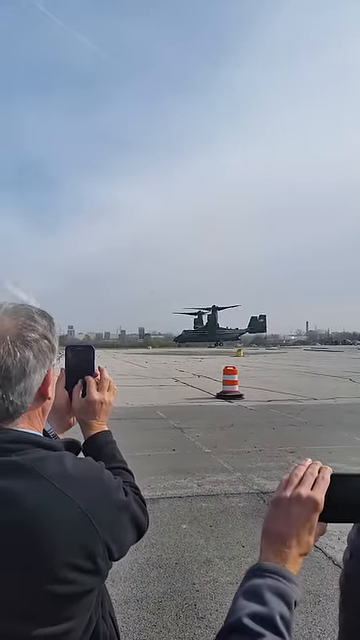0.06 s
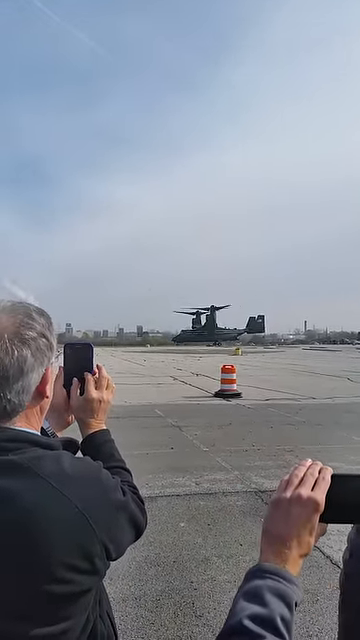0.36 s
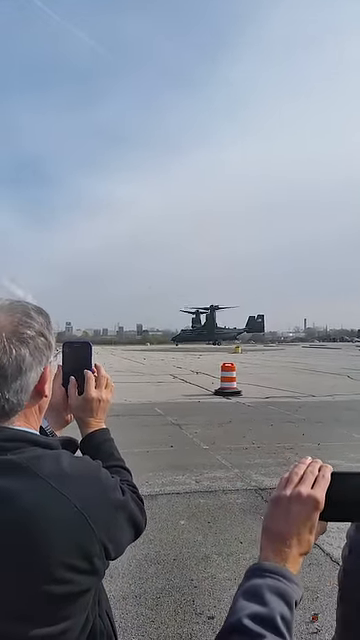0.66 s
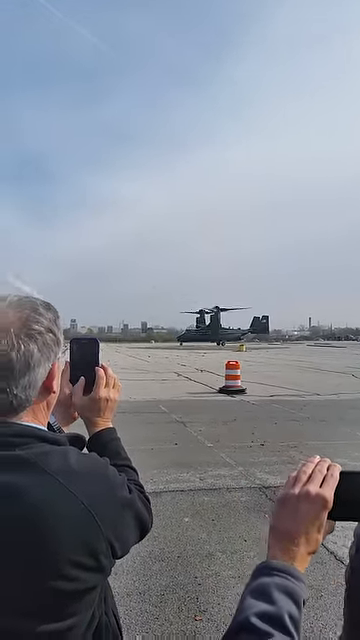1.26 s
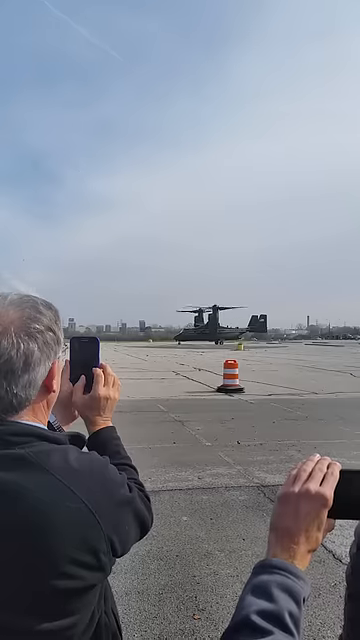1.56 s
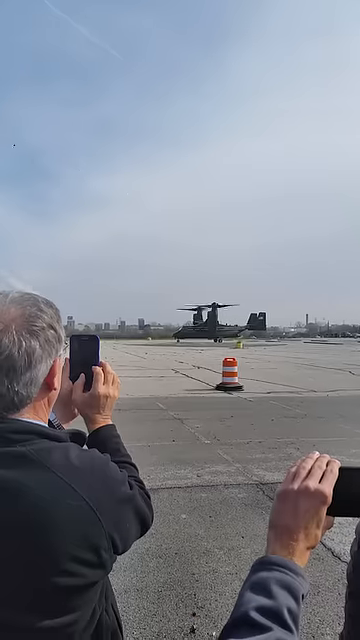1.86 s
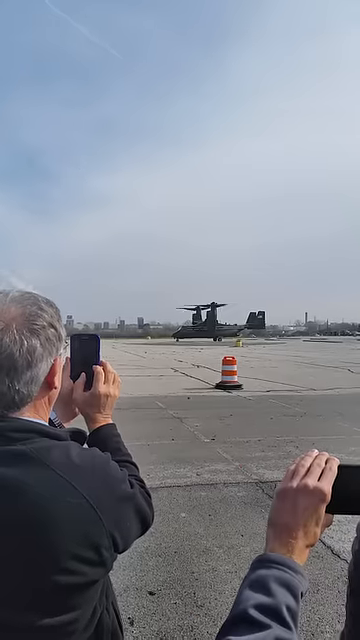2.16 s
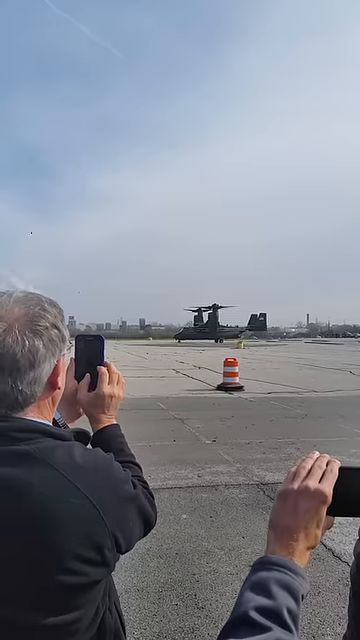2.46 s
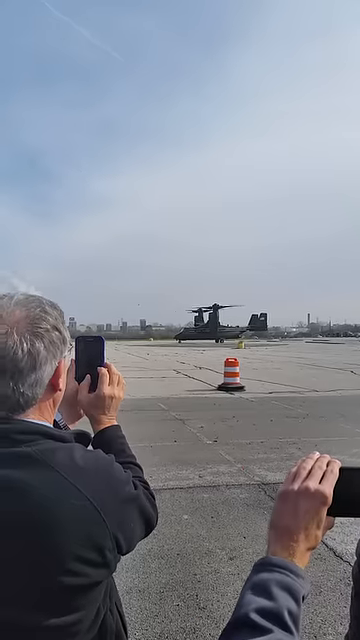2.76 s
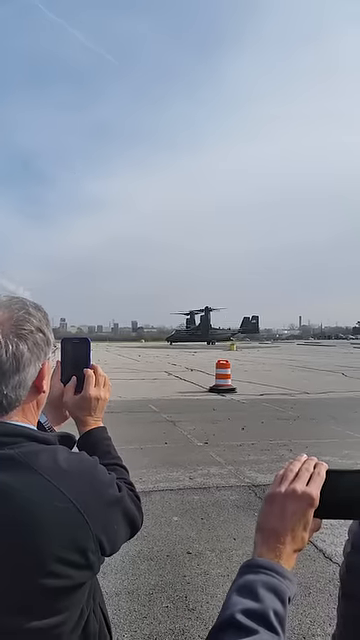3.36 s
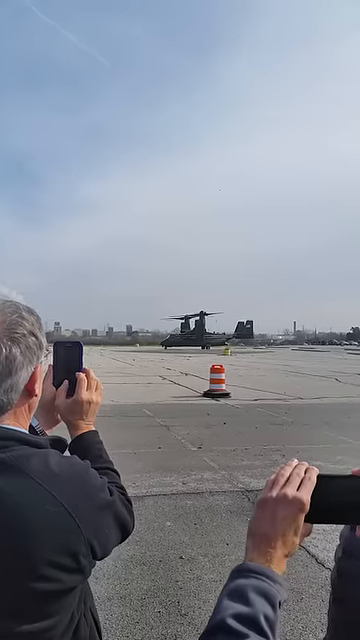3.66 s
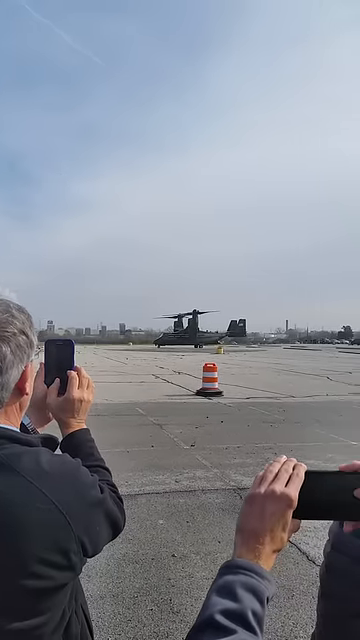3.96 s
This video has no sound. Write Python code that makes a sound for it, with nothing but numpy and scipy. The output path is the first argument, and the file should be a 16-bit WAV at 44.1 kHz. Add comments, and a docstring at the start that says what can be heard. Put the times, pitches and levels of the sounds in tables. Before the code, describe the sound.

Tiltrotor aircraft rotors chopping fast and heavy over a steady roar and turbine hiss.

```python
"""A fast, heavy chopping, about twenty beats a second: a tiltrotor aircraft on open concrete.
Each passing blade pushes air aside with a round thump, then hits the swirl left by a blade tip
with a sharper slap and a ragged burst of noise. Underneath, air blown downward roars and the
turbines hiss and whine. Near the end the rotors slow a little, the slaps give way to deeper
thumps and a pulsing swish, and the hiss swells."""
import sys
import numpy as np
from scipy import signal
from scipy.fft import rfft, irfft
from scipy.io import wavfile

SR = 44100
rng = np.random.default_rng(int(sys.argv[2]) if len(sys.argv) > 2 else 0)


def store_wav(level_fs):
    """Save 16-bit WAV to argv[1]."""
    pcm = np.round(np.clip(np.atleast_2d(level_fs), -1, 1) * 32767)
    wavfile.write(sys.argv[1], SR, pcm.T.astype(np.int16))


N = 176400
T = np.arange(N) / SR
HZ = np.maximum(np.fft.rfftfreq(N, 1 / SR), 1)

# how fast the blades pass (time [s], rate [passes per s])
BLADE_RATE = [(0, 20.49), (1.3, 20.58), (1.9, 20.53), (2.3, 20.73), (2.7, 20.62), (3.0, 20.1), (3.3, 19.97),
              (3.6, 19.56), (4, 19.54)]
# the wait from thump to slap (time [s], delay [s])
SLAP_DELAY = [(0, 0.014), (.25, 0.012), (.6, 0.01), (.83, 0.0088), (.95, 0.01), (1.1, 0.0087),
              (1.95, 0.0097), (2.2, 0.0077), (2.45, .0095), (2.75, 0.008), (3, 0.0088), (4, 0.0083)]
def rotors():
    """The passing blades set one beat for all these sounds."""
    rate = in_time(BLADE_RATE)[0]
    count = np.cumsum(rate) / SR - 0.09  # a blade passes at each whole number
    passes = np.interp(np.arange(int(count[-1]) + 1), count, T)
    strikes = passes + in_time(SLAP_DELAY, passes)[0]
    slap_count = count - in_time(SLAP_DELAY)[0] * rate
    beats = thumps(passes) + slaps(strikes) + wake(strikes) + crackle(strikes)
    return beats + swish(passes) + knocks(strikes) + drone(passes) + hum(count) + tones(slap_count)

# each rotor's thump (time [s], peak [dB], pitch [Hz])
FIRST_THUMP = [(0, -12.5, 126.4), (.3, -14, 91), (0.501, -8, 116.5), (.87, -21.5, 135),
               (1.25, -10.5, 111.4), (1.4, -16.5, 89), (1.529, -8.5, 121), (1.82, -10, 124),
               (2.05, -13.5, 104.5), (2.4, -8.5, 121), (2.7, -5, 107), (3.0, -11, 89), (3.3, -4, 108.7),
               (3.549, -8, 99), (3.75, -5.5, 83), (4, -13.5, 61.6)]
SECOND_THUMP = [(0, -9.5, 147), (.27, -13.5, 174), (.4, -33, 162), (.53, -15.5, 168), (.75, -14, 162.4),
                (1.1, -20.5, 154), (1.7, -16.5, 149), (2.0, -17, 159.7), (2.4, -10, 154),
                (2.63, -15, 150.4), (2.92, -8, 160), (3.3, -27.5, 174), (3.8, -28, 156), (4, -20.5, 163)]
def thumps(passes):
    """Each blade pushes air aside; the second rotor follows just behind the first."""
    first = pulses(passes, FIRST_THUMP, rise_s=0.0066, fall_s=0.0054, vary_db=1, vary_s=0.000067)
    second = pulses(passes + 0.00888, SECOND_THUMP, rise_s=0.0053, fall_s=0.019, vary_db=1, vary_s=0.0002)
    return first + second

# the slap (time [s], peak [dB], pitch [Hz])
SLAP = [(0, 0.5, 207), (.11, -15.5, 230), (0.232, 2.5, 201), (0.399, -9, 208), (.5, -2.5, 188),
        (.65, -0.5, 220), (.77, 0, 207), (.89, -10.5, 206), (1.02, -2.5, 226), (1.171, -9.5, 191),
        (1.45, -8.5, 199), (1.599, -29, 183), (1.88, -15.5, 205), (2.12, -6.5, 207), (2.42, -13.5, 188),
        (2.75, -16, 247), (3.05, -2, 194), (3.341, -4.5, 234), (3.52, -10.5, 210), (4, -12, 194)]
# its echoes (delay [s], level [dB])
ECHOES = [(.0092, -18.5), (0.0194, -22)]
def slaps(strikes):
    """A blade hits the swirl of air left by a blade tip; two faint echoes follow."""
    slap = pulses(strikes, SLAP, rise_s=0.0031, fall_s=0.004, vary_db=0.5, vary_s=0.00065)
    return slap + sum(from_db(db) * np.interp(T - delay, T, slap, left=0) for delay, db in ECHOES)

# churned air (time [s], level [dB]) and its tone (pitch [Hz], level [dB])
WAKE_LEVEL = [(0, -11.5), (.15, -23.5), (.37, -12), (.52, -20), (.95, -13.5), (1.4, -22.5), (1.83, -25),
              (1.998, -14), (2.28, -13), (2.469, -25.5), (2.631, -14), (2.85, -14.5), (3.08, -20.5),
              (3.33, -20), (3.5, -41.5), (3.7, -26), (4, -25.5)]
WAKE = [(30, -20), (80, -4.5), (170, -8), (300, 4.5), (365, -8.5), (415, -2), (500, -18.5), (650, -17.5),
        (1000, -33.5), (1500, -40), (4000, -85)]
def wake(strikes):
    """Churned air behind the blades gives a ragged burst on each beat."""
    return bursts(strikes - 0.001, WAKE_LEVEL, WAKE, rise_s=0.0096, fall_s=0.026, memory=0.86, vary_db=0.6)

# crackle (time [s], level [dB]) and its tone (pitch [Hz], level [dB])
CRACKLE_LEVEL = [(0, -24.5), (.2, -26.5), (.5, -43.5), (1.0, -37.5), (1.299, -28.5), (1.8, -28.5),
                 (2.3, -33), (2.6, -24), (3.0, -33), (3.25, -37.5), (4, -19.5)]
CRACKLE = [(200, 7.5), (600, 6), (1000, 1.5), (1400, -4), (2400, -5.5), (3200, -10), (5000, -18.5),
           (12000, -37)]
def crackle(strikes):
    """A bright, uneven edge on each slap."""
    return bursts(strikes - 0.003, CRACKLE_LEVEL, CRACKLE,
                  rise_s=0.0051, fall_s=0.0084, memory=0.18, vary_db=4)

# swish (time [s], level [dB]) and its tone (pitch [Hz], level [dB])
SWISH_LEVEL = [(0, -76), (2, -46), (3.1, -36.5), (3.4, -27), (3.65, -25), (4, -24)]
SWISH = [(200, -35), (700, 3), (1300, -3), (2300, 2), (3200, -6.5), (4500, -8.5), (6000, -12), (7800, -7),
         (10000, -10.5), (13000, -25.5)]
def swish(passes):
    """Blades swish through the air, loudest near the end."""
    return bursts(passes + 0.003, SWISH_LEVEL, SWISH, rise_s=0.0095, fall_s=0.024, memory=0.05, vary_db=1)

# knock (time [s], level [dB]) and its tone (pitch [Hz], level [dB])
KNOCK_LEVEL = [(0, -29.5), (.55, -24.5), (1.08, -23.5), (1.25, -26.5), (1.8, -29), (1.949, -27),
               (2.25, -23.5), (2.42, -26.5), (2.56, -24.5), (2.95, -39.5), (3.2, -24.5), (3.5, -25),
               (4, -38)]
KNOCK = [(200, -8.5), (450, -8.5), (680, 9), (1000, -6.5), (1400, -13.5), (2400, -16), (5000, -39),
         (12000, -68)]
def knocks(strikes):
    """A hard knock starts each slap."""
    return bursts(strikes - 0.003, KNOCK_LEVEL, KNOCK, rise_s=0.0049, fall_s=0.011, memory=0.5, vary_db=2)

# hard blade hits (time [s], crack [dB], knock [dB])
HARD_HITS = [(0.01, -16, -24.5), (0.064, -25, -21), (.305, -32, -26), (.55, -46.5, -22.5),
             (0.936, -31, -19.5), (1.037, -38, -21), (1.372, -17.5, -28), (1.422, -27, -26.5),
             (1.518, -22.5, -23), (1.921, -36, -19), (1.965, -33, -19), (2.304, -32, -17.5),
             (2.347, -27.5, -16), (2.542, -37, -19), (3.475, -32.5, -23.5), (3.526, -25.5, -29),
             (3.631, -25.5, -21), (3.68, -26, -32.5)]
# the crack's tone (pitch [Hz], level [dB])
CRACK = [(300, 2), (900, 6.5), (2400, 8.5), (3300, -17), (5000, -13), (12000, -39)]
def cracks():
    """Now and then a blade hits a swirl squarely: a bright crack over a dull knock."""
    bright = sum(from_db(db) * swell(T - s, rise_s=0.001, fall_s=0.0025) for s, db, _ in HARD_HITS)
    dull = sum(from_db(db) * swell(T - s, rise_s=0.0018, fall_s=0.003) for s, _, db in HARD_HITS)
    return spread(bright * noise(CRACK) + dull * noise(KNOCK))

# drone (time [s], level [dB]) and its tone (pitch [Hz], level [dB])
DRONE_LEVEL = [(0, -14), (.6, -29.5), (1.1, -46.5), (1.85, -29), (2.05, -19.5), (2.3, -21.5), (2.55, -22.5),
               (2.85, -25.5), (3.1, -28), (4, -28)]
DRONE = [(40, -35), (65, -18), (95, 2), (150, -2.5), (200, -3), (300, 1.5), (400, -3), (900, -62)]
def drone(passes):
    """A low, rolling sound fills the gaps between beats."""
    return bursts(passes + 0.028, DRONE_LEVEL, DRONE, rise_s=0.017, fall_s=0.033, memory=0.98, vary_db=1.3)

# deep hum (time [s], level [dB])
HUM_LEVEL = [(0, -34.5), (.3, -39.5), (1.1, -35.5), (2, -33.5), (2.8, -29), (3.07, -42), (3.4, -26.5),
             (3.65, -34.5), (3.9, -32.5), (4, -14)]
def hum(count):
    """The rotors press on the air and hum at twice the blade rate."""
    return from_db(in_time(HUM_LEVEL)[0]) * np.sqrt(2) * np.cos(2 * np.pi * 2 * count)

# three pitches [times the blade rate] and their levels (time [s], low [dB], middle [dB], high [dB])
MULTIPLES = [5, 8, 11]
TONE_LEVELS = [(0, -38, -23.5, -36), (.3, -45, -25, -27), (.7, -46.5, -32, -22.5),
               (1.101, -45.5, -36, -32.5), (1.8, -50, -42, -52), (2.05, -20.5, -28.5, -35),
               (2.27, -20.5, -24, -36), (2.5, -42, -32, -33.5), (3.1, -43, -42, -32),
               (4, -37.5, -39.5, -46)]
def tones(slap_count):
    """Clean rotor tones whose waves peak with the slaps."""
    gains = from_db(in_time(TONE_LEVELS)) * np.sqrt(2)
    return sum(gain * np.cos(2 * np.pi * k * slap_count) for k, gain in zip(MULTIPLES, gains))

# roar (time [s], level [dB]) and its tone (pitch [Hz], level [dB])
ROAR_LEVEL = [(0, -25), (1, -25.5), (1.7, -25), (2.25, -22), (3.1, -25), (3.6, -23.5), (4, -20.5)]
ROAR = [(20, -27), (60, 3.5), (110, 5), (250, 2.5), (480, -5.5), (680, -10), (1000, -13), (1350, -19.5),
        (1900, -22), (2350, -19), (3000, -38.5), (4500, -43), (12000, -67)]
def roar():
    """Air blown down by the rotors roars steadily."""
    return steady_noise(ROAR_LEVEL, ROAR, flutter_db=1.75)

# turbine and exhaust hiss (time [s], level [dB]) and their tones (pitch [Hz], level [dB])
TURBINE_LEVEL = [(0, -38), (.45, -43.5), (.95, -44), (1.25, -42.5), (1.9, -45), (2.3, -39), (3.1, -39.5),
                 (3.6, -36.5), (4, -33.5)]
EXHAUST_LEVEL = [(0, -83), (2.15, -76.5), (2.4, -54.5), (3.1, -51), (3.6, -39), (4, -39.5)]
TURBINE = [(1000, 7.5), (2400, 7), (3500, 4.5), (4800, 2), (5800, -1), (6800, 4), (8000, 1), (9300, -2),
           (11000, -20.5), (13000, -42)]
EXHAUST = [(2000, -5), (5000, -5.5), (8000, -9), (10500, 7.5), (12500, 5)]
def engine_hiss():
    """The turbines hiss throughout; their brighter exhaust swells late."""
    turbine = steady_noise(TURBINE_LEVEL, TURBINE, flutter_db=1.23)
    return turbine + steady_noise(EXHAUST_LEVEL, EXHAUST, flutter_db=3)

# the engine's air compressor (time [s], pitch [Hz], level [dB])
WHINE = [(0, 6775, -74.5), (1.9, 6600, -55), (2.2, 6456, -48.5), (2.7, 6090, -47.5), (3.3, 5940, -46),
         (4, 5660, -42.5)]
def whine(width_hz=350):
    """The compressor's blurred whine sinks as the turbines slow."""
    hz, db = in_time(WHINE)
    blur = irfft(rfft(rng.standard_normal((2, N))) / (1 + (HZ / width_hz) ** 2), N)
    tone = np.sin(2 * np.pi * np.cumsum(hz) / SR)
    return spread(rms_one(blur * tone)) * from_db(db)

def pulses(times, curve, rise_s, fall_s, vary_db, vary_s):
    """One short push of air per blade, each a little different in level, timing and pitch."""
    out, t = np.zeros(N), np.arange(-SR // 20, SR // 20) / SR
    shape = np.exp(-np.abs(t / np.where(t < 0, rise_s, fall_s)) ** 1.215)
    chance = rng.standard_normal((len(times), 3))
    for s, db, hz, (louder, later, higher) in zip(times, *in_time(curve, times), chance):
        wave = np.cos(2 * np.pi * hz * (1 + 0.011 * higher) * t)
        add(out, s + t[0] + vary_s * later, from_db(db + vary_db * louder) * shape * wave)
    return out

def bursts(times, level, tone, rise_s, fall_s, memory, vary_db, size=8192):
    """One puff of noise per blade; with memory near 1, each meets almost the same swirls as the last."""
    out, t = np.zeros((2, N)), (np.arange(size) - size // 4) / SR
    colour = from_db(per_hz(tone, np.fft.rfftfreq(size, 1 / SR) + 1))
    shape = swell(t, rise_s, fall_s)
    swirls = rng.standard_normal((2, size))
    for s, db in zip(times, *in_time(level, times)):
        swirls = memory * swirls + np.sqrt(1 - memory ** 2) * rng.standard_normal(swirls.shape)
        burst = irfft(rfft(swirls) * colour) * shape
        evened = burst / burst.std(axis=1, keepdims=True) * shape.std()
        add(out, s + t[0], evened * from_db(db + vary_db * rng.standard_normal()))
    return spread(out)

def steady_noise(level, tone, flutter_db):
    """Rushing noise that flutters a little on its way through the air."""
    flutter = noise([(1, 0), (12, 0), (60, -25), (200, -90)], shape=N)
    return spread(noise(tone)) * from_db(in_time(level)[0] + flutter_db * flutter)

# how alike left and right are (pitch [Hz], likeness [0 to 1])
LIKENESS = [(100, 1), (300, 0.91), (520, 0.74), (750, 1), (1300, 0.25), (1800, 0.89), (2300, 1),
            (3100, 0.062), (4300, 0.55), (5500, 0.28), (7300, 0.46), (9500, .25), (12000, 0.16)]
def spread(pair):
    """Two unrelated sounds become left and right, alike in the bass and less so in the treble."""
    alike = per_hz(LIKENESS)
    mid, side = rfft(pair) * np.sqrt([(1 + alike) / 2, (1 - alike) / 2])
    return irfft([mid + side, mid - side], N)

def noise(tone, shape=(2, N)):
    """Noise of strength 1; the tone table says which pitches stand out."""
    return rms_one(irfft(rfft(rng.standard_normal(shape)) * from_db(per_hz(tone)), N))

def swell(t, rise_s, fall_s):
    """A smooth rise to the top at t = 0, then a dying tail."""
    return np.exp(-(np.minimum(t, 0) / rise_s) ** 2 - np.maximum(t, 0) / fall_s)

def add(out, start_s, sound):
    """Mix a sound in from a given time on."""
    i = int(round(start_s * SR))
    a, b = max(i, 0), min(i + sound.shape[-1], N)
    if b > a:
        out[..., a:b] += sound[..., a - i:b - i]

def in_time(rows, at=T):
    """Read a table's columns at the given times."""
    s, *columns = np.transpose(rows)
    return [np.interp(at, s, c) for c in columns]

def per_hz(points, at=HZ):
    """Read a table at the given pitches, with octaves evenly spaced."""
    hz, value = np.transpose(points)
    return np.interp(np.log(at), np.log(hz), value)

def from_db(db):
    """Turn decibels into a multiplier."""
    return 10 ** (np.asarray(db) / 20)

def rms_one(x):
    """Scale to an average strength (rms) of 1."""
    return x / np.sqrt(np.mean(x ** 2) + 1e-20)

def scene():
    """Rushing air, engines and rotors together."""
    return roar() + engine_hiss() + rotors() + cracks() + whine()

# how much louder the left side is (pitch [Hz], level [dB])
BALANCE = [(100, -.5), (330, -.3), (550, 2.2), (700, 2), (850, .4), (1230, 4.5), (1800, 0), (2300, -6),
           (3100, -.3), (4400, -2), (5600, .5), (6600, 1), (8000, 12), (9400, 1), (11000, 4)]
# how far ahead the left wave is (pitch [Hz], lead [radians])
LEFT_LEAD = [(60, 0.14), (300, 0.21), (1030, 0.39), (1460, -0.85), (2000, 1.25), (2500, 0.85), (3200, 2),
             (4300, 3), (5200, 4.5), (7100, 7.5), (8700, 8), (9500, 11)]
# the microphone's weak bass (pitch [Hz], level [dB])
LOW_CUT = [(8, -33.5), (20, -23.5), (36, 0)]
def record(dry):
    """Two microphone openings each colour and delay the sound; peaks are rounded, top treble is cut."""
    left = from_db(per_hz(BALANCE) / 2) * np.exp(1j * per_hz(LEFT_LEAD) / 2)
    sides = irfft(rfft(dry) * from_db(per_hz(LOW_CUT)) * np.array([left, 1 / left]), N)
    rounded = sides / (1 + sides ** 8) ** (1 / 8)
    treble_cut = signal.cheby2(14, 70, 14100, fs=SR, output="sos")  # 70 dB down from 14100 Hz up
    return signal.sosfilt(treble_cut, rounded)

dry = scene()
out = record(dry)
store_wav(out)
```